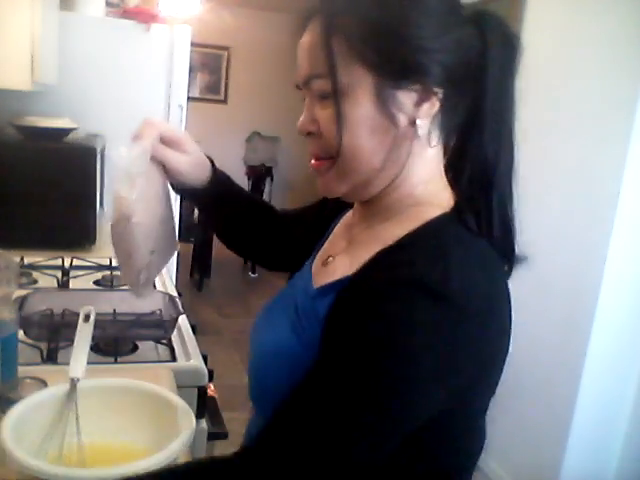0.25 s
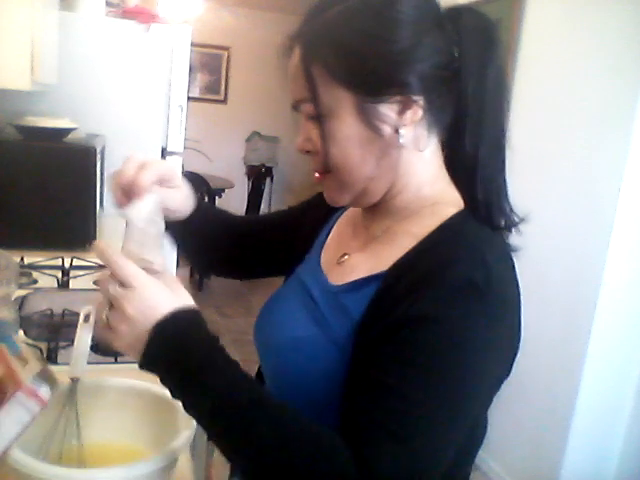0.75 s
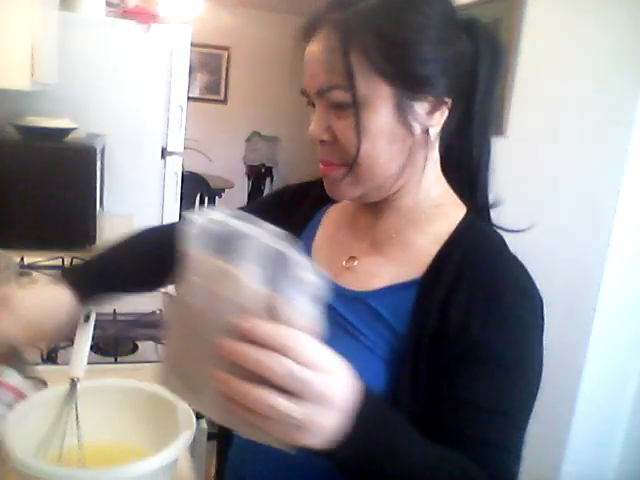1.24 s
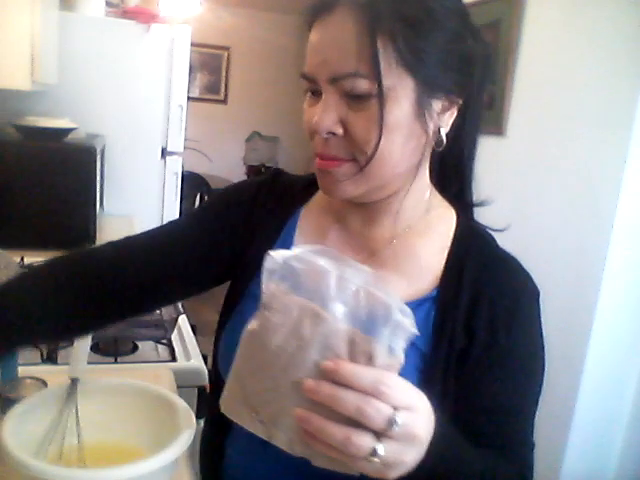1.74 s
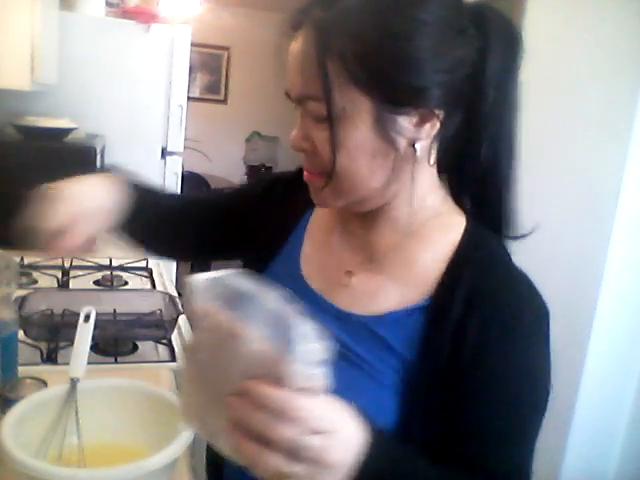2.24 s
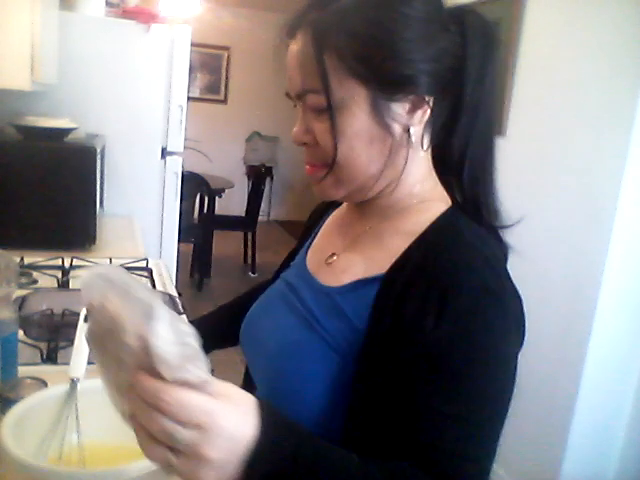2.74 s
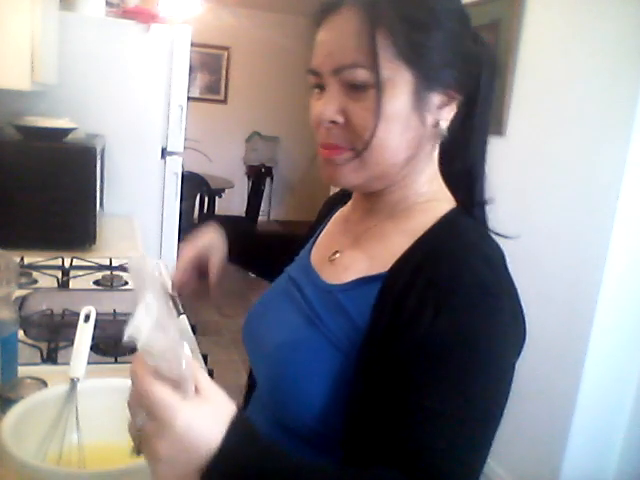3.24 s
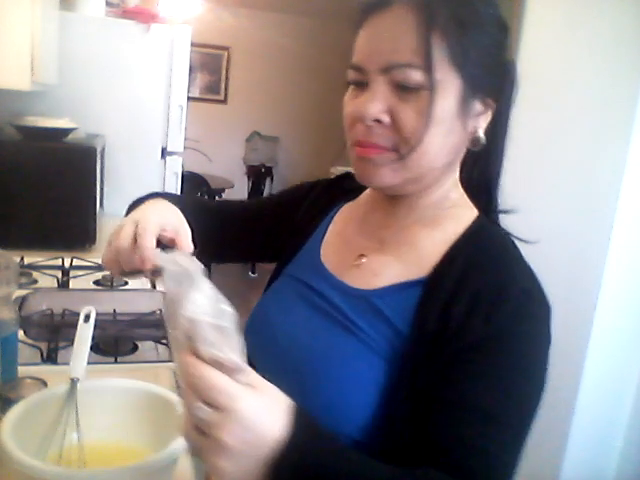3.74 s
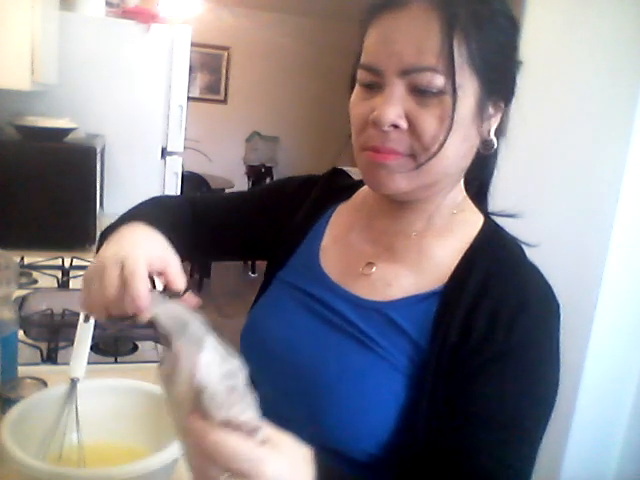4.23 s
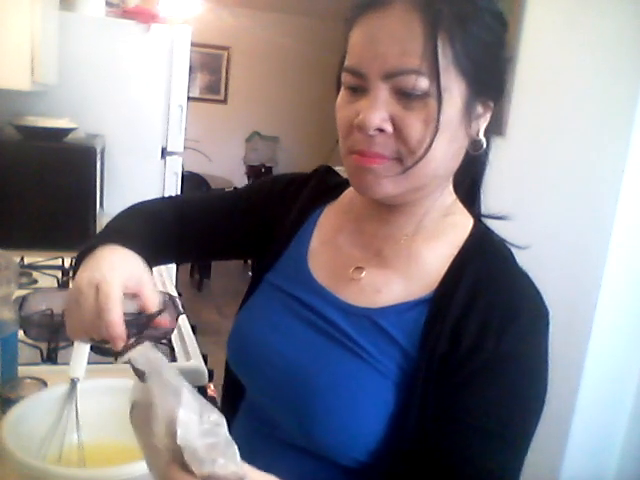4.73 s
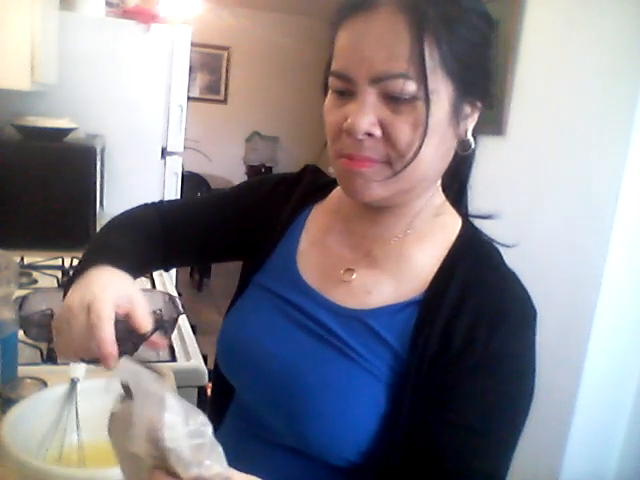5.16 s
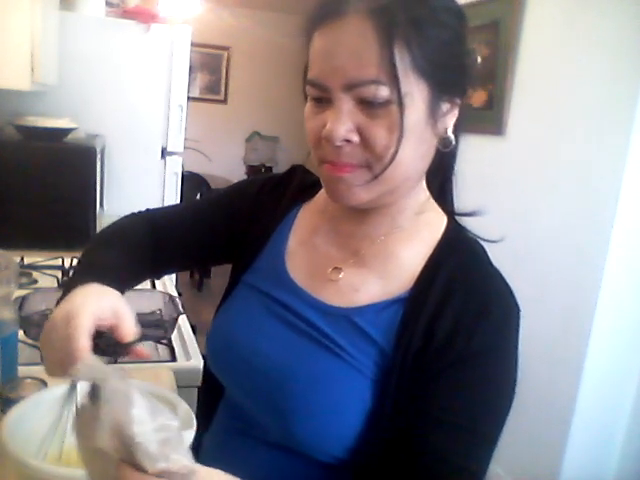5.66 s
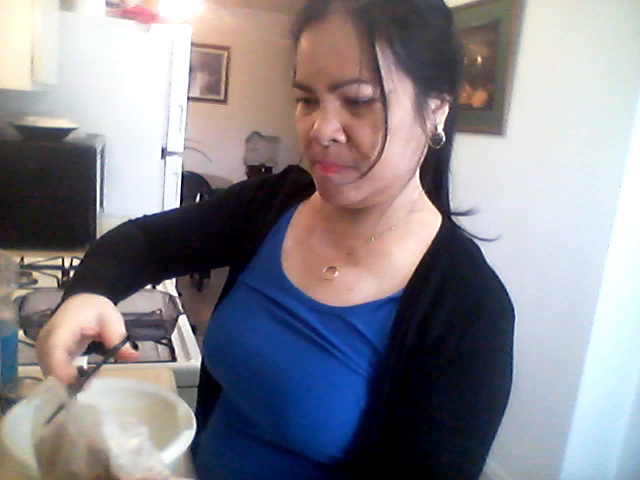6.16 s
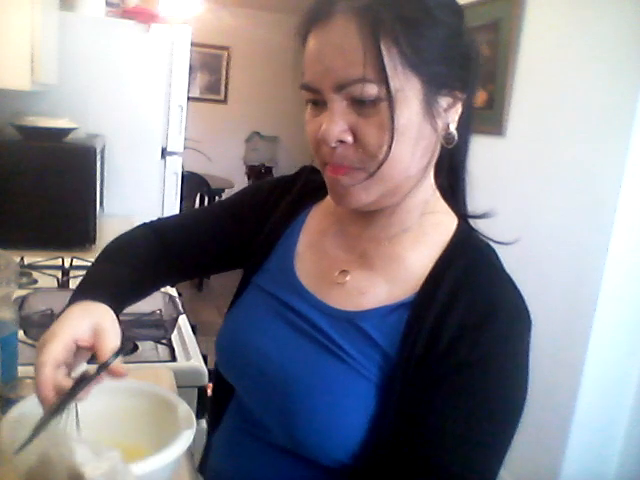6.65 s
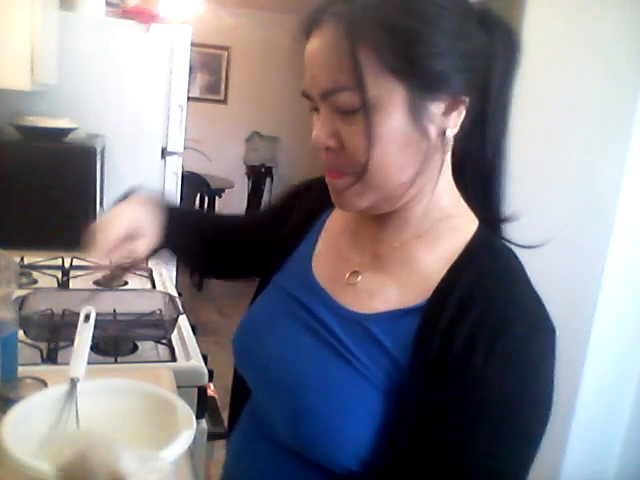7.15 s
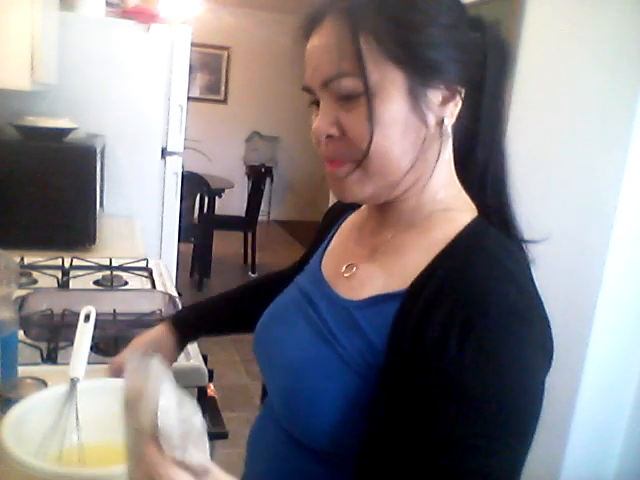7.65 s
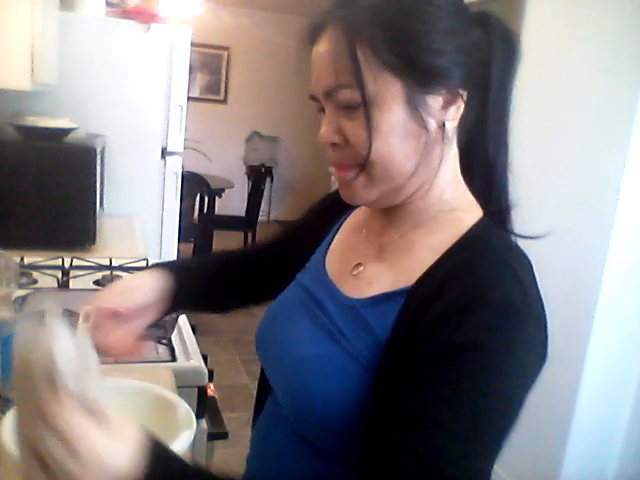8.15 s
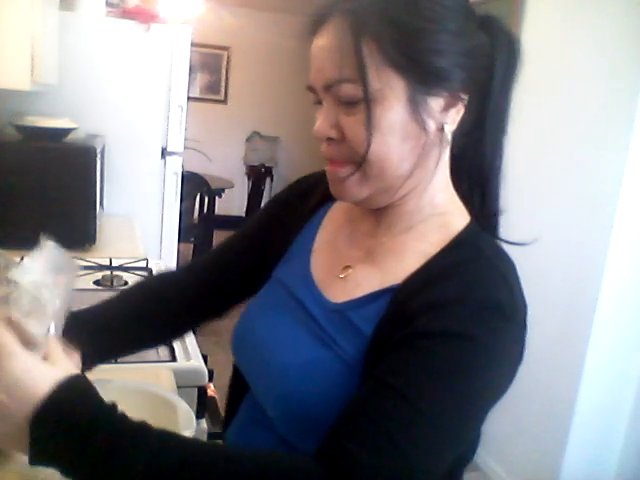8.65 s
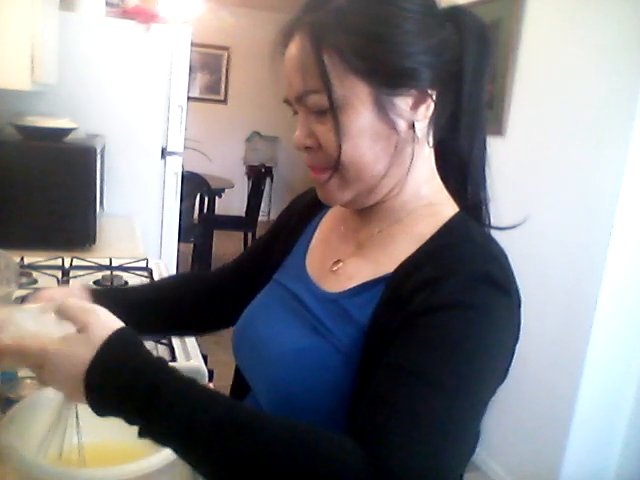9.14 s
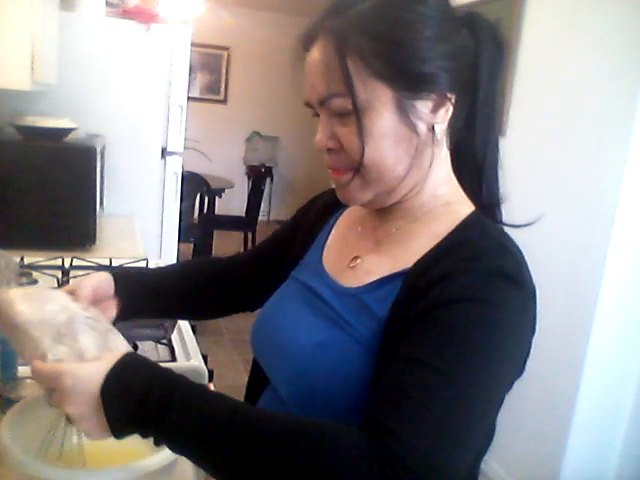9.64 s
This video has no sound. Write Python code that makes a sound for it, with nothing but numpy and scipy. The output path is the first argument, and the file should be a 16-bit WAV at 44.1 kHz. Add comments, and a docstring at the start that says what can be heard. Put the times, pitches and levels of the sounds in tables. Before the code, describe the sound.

A plastic pouch crinkles in someone's hands while a cardboard box bumps softly on a counter. Scissors are picked up with a brief metallic rattle, and the plastic crackles densely as it is cut. The scissors are then dropped with a loud clatter, and the crinkling resumes. The sounds are close, in a small kitchen with a short echo and a faint appliance hum.

```python
"""Cutting open a plastic pouch

A pouch of powder is handled and cut open in a small kitchen, over the hum of an appliance. Creases in
the film crackle and snap as brief bursts of noise. A cardboard box bumps the counter, exciting damped
resonances, and friction gives faint squeaks. Scissors are picked up and dropped: their steel blades
ring in many modes and their loose handles clatter. The walls add a short reverberation."""
import sys
import numpy as np
from scipy import signal
from scipy.fft import rfft, irfft, next_fast_len
from scipy.io import wavfile

SR = 44100
rng = np.random.default_rng(int(sys.argv[2]) if len(sys.argv) > 2 else 0)


def unload_audio(sound):
    """Save the sound as a 16-bit wav file, at the path given as the first command line argument."""
    columns = np.transpose(np.atleast_2d(sound))
    # keep every value between -1 and 1, then stretch to whole-number steps
    steps = np.round(np.clip(columns, -1, 1) * 32767)
    wavfile.write(sys.argv[1], SR, steps.astype(np.int16))


N = 437472

# creases snapping: t/s, level/dB, relative dull body/dB, relative crisp top/dB, f/Hz
SNAPS = [(0.0592, -34.5, -18, -11, 6050), (0.145, -38, -15, -22, 6190), (0.2139, -39, -18, -11, 5060),
         (0.2304, -30.5, -25, -17, 5790), (0.2816, -35, -1, -28, 5280), (0.347, -33, -28, -13, 6090),
         (0.398, -40, -17, -31, 4830), (0.451, -32, -42, -18, 5780), (0.5014, -40, -14, -28, 4210),
         (0.5668, -29.5, -30, -22.5, 3050), (0.621, -42.5, -13, -16, 5450), (0.6937, -36, 3, -43, 2510),
         (0.7746, -51, -4, -23, 3070), (0.8026, -27.5, -9, -19, 4930), (0.843, -21, -26, -28, 6030),
         (0.8845, -26, -18, -37, 6130), (0.9373, -28, -28, -18, 6350), (0.9684, -27, -31, -30, 6290),
         (1.065, -33, -12, -24, 6030), (1.1573, -35, -35, -36, 5150), (1.176, -32, -45, -19, 5820),
         (1.3993, -34.5, -18, -24, 5740), (1.5604, -54, -6, -25, 3240), (1.8117, -46.5, -14, -29, 2670),
         (1.883, -42, -36, -19, 5480), (1.944, -29.5, -16, -19, 2590), (1.9776, -25, -9, -21, 5610),
         (2.088, -32, -14, -25, 5400), (2.139, -50, -1.5, -22, 6030), (2.3285, -43.5, -13, -21, 5960),
         (2.4154, -39.5, -20, -20, 3200), (3.1213, -52, -29, -5, 6340), (3.1747, -54, -12, -12, 6100),
         (3.243, -38.5, -14, -27, 4910), (3.2914, -53, -15, -26, 3020), (3.3457, -50, -9, -9, 5570),
         (3.3738, -44.5, 0, -4.5, 3230), (3.641, -52, -18, -26, 2750), (3.8556, -37.5, -18, -19, 3010),
         (3.8916, -33.5, -20, -21, 5510), (3.9517, -42, -10, -29, 4120), (4.0013, -24.5, -36, -16, 6350),
         (4.0136, -20, -25, -25, 6350), (4.0513, -15.5, -22, -20, 2960), (4.1428, -17, -30, -17, 3660),
         (4.217, -25.5, -15.5, -32, 5830), (4.3445, -29.5, -14, -24, 4600), (4.3576, -28.5, -17, -15, 4450),
         (4.4164, -30, -32, -25, 4430), (4.4454, -31.5, -7, -17, 3500), (4.518, -23.5, -40, -11, 4460),
         (4.6044, -33, -26, -11, 4570), (4.6243, -28, -29, -24, 3850), (4.6533, -22, -34, -27, 6200),
         (4.8335, -24.5, -40, -25, 4600), (4.8948, -34.5, -9.5, -14, 6290),
         (4.938, -20.5, -17.5, -16, 5900), (5.017, -31, -15, -15, 6970), (5.0546, -33, -22, -18, 6010),
         (5.1803, -32, -16, -22, 5250), (5.2609, -47, -12, -13, 3990), (5.3416, -28.5, -31, -13, 5700),
         (5.372, -29, -14, -26, 4000), (5.4051, -16.5, -21.5, -18.5, 2510), (5.456, -25, -16.5, -21, 3960),
         (5.5404, -16.5, -35, -23, 6230), (5.6096, -27, -21, -21, 5010), (5.6407, -25, -8, -18, 6160),
         (5.7189, -36.5, -24, -36, 5830), (5.8577, -31, -15, -7, 6420), (5.998, -28, -28, -15, 6130),
         (6.0485, -29.5, -16, -13, 5600), (6.085, -26.5, -20, -17, 5650), (6.123, -36, -33, -25, 5970),
         (6.183, -25.5, -33.5, -14.5, 5970), (6.2045, -25.5, -29, -20, 6420), (6.31, -32, -28, -23, 4570),
         (6.329, -19.5, -29, -20, 6860), (6.358, -21.5, -30, -14, 5770), (6.402, -26, -24, -13, 5710),
         (6.4425, -19, -17, -25, 5830), (6.5295, -32.5, -14.5, -18, 5910), (6.5512, -27.5, -26, -17, 5840),
         (6.641, -34, -13, -18, 4450), (6.669, -34, -17, -17, 5590), (6.708, -32, -27, -17, 5730),
         (6.7675, -25, -7.5, -16, 3890), (6.8192, -28.5, -23, -6.5, 5500), (6.8733, -38, -10, -31, 3940),
         (6.987, -23.5, -19, -17.5, 6060), (8.3784, -35.5, -28, -8.5, 4490),
         (8.4598, -33.5, -35, -14, 5940), (8.4754, -28, -36, -13, 5970), (8.526, -32.5, -36, -12.5, 5620),
         (8.635, -30.5, -44, -16, 5990), (8.6687, -29.5, -39, -15, 5990), (8.688, -32, -35, -21, 6180),
         (8.739, -35, -34, -13, 6170), (8.9216, -38, -15, -21, 6500), (8.956, -37, -25, -15, 5890),
         (9.0075, -30, -9, -22, 6040), (9.0593, -54, -32, -37, 5640), (9.0895, -33, -23, -34, 5960),
         (9.1436, -31, -15, -22, 5220), (9.175, -28, -16, -17, 5030), (9.2209, -23.5, -29, -23, 6460),
         (9.239, -19.5, -26, -22, 5300), (9.2683, -29, -15, -13, 5170), (9.3258, -25, -29, -16.5, 6210),
         (9.3877, -27.5, -11.5, -22, 5700), (9.4466, -22.5, -22, -10.5, 5730), (9.495, -20, -42, -19, 5770),
         (9.5557, -36, -25, -29, 5830), (9.5984, -21.5, -20, -19, 5260), (9.6699, -38, -24, -19, 5560),
         (9.7971, -31.5, -9.5, -9, 6380), (9.848, -33, -18, -18, 6290)]
# hands squeezing, turning or cutting the pouch: t/s, swell/s, level/dB, swell/dB, relative dull body/dB
SQUEEZES = [(0, 0.0062, -40, -34, -2.5), (.1, 0.076, -52.5, 2, -14), (.21, 0.095, -43.5, 11, -0.5),
            (.33, 0.097, -53, 9, -13), (.44, 0.021, -45.5, -2, -16), (.69, 0.013, -52.5, -21, -5),
            (.76, 0.11, -33, 20.5, -7), (.87, 0.098, -34, 8.5, -6), (1.15, 0.0087, -41, -4, -27),
            (1.2, 0.19, -61.5, -5, -7), (1.395, 0.087, -57, 11, -7), (1.88, 0.07, -49, 8, 3),
            (2.08, .01, -48, 14, -5), (2.33, 0.11, -68, -2, -10), (3.11, 0.014, -57, 17, -5),
            (3.16, 0.13, -59.5, 6, -6), (3.366, 0.17, -67.5, -18, -20), (3.64, .1, -74, -11, -14),
            (3.8, .18, -53, 5.5, -12), (3.99, 0.055, -28.5, 12.5, -9), (4.135, 0.11, -35, 7, -7.5),
            (4.3, .09, -45.5, 6, -7.5), (4.4, 0.067, -30, 10.5, -10), (4.47, 0.035, -25, 9.5, -10),
            (4.6, 0.071, -31, 15, -7), (4.74, 0.1, -56.5, -4, -7), (4.83, .12, -33.5, 38, -7),
            (5, 0.073, -29.5, 37, -6.5), (5.15, 0.05, -43, 0, -10), (5.24, 0.075, -39, 1.5, -9.5),
            (5.345, 0.061, -32.5, 6, -3.5), (5.44, 0.11, -51.5, -5, -1.5), (5.525, 0.016, -32.5, -6, -6.5),
            (5.57, .17, -47.5, -10, -7.5), (5.755, 0.11, -24, 17, -7.5), (5.96, .05, -28.5, 17.5, -8.5),
            (6.04, 0.19, -44.5, -4, -8.5), (6.3, 0.12, -32, 9.5, -8), (6.52, 0.038, -39.5, 28, -8),
            (6.61, 0.098, -41, 9, -7.5), (6.73, 0.024, -43, 19, -16), (6.81, 0.026, -45, 6, -9),
            (6.975, 0.06, -51, 1, -15.5), (8.38, 0.066, -56.5, 23, -9.5), (8.56, .06, -56, 18, -23),
            (8.622, .23, -37.5, 9.5, -13.5), (8.88, .31, -41, 6, -5.5), (9.2, 0.044, -47, 9, -1),
            (9.26, 0.044, -56, 5, 0), (9.32, 0.12, -48, 4, -1.5), (9.42, 0.082, -29.5, 16, -12.5),
            (9.53, 0.16, -34.5, 14, -9), (9.76, 0.037, -37, 25, -10), (9.85, 0.056, -51.5, 2, 1.5)]
# spectrum of the crackling film: f/Hz, level/dB
FILM_SPECTRUM = [(710, -47), (1200, -16.5), (1490, -5), (1770, -11), (2040, -5.5), (2270, -11.5),
                 (2480, -5), (4450, -1), (4910, -2.5), (5780, 1.5), (7100, -4.5), (8720, -13.5),
                 (12700, -18.5), (16000, -24.5)]
# dull body spectrum of the pouch, the box and the knocks: f/Hz, level/dB
BODY_SPECTRUM = [(150, -38), (250, -79), (292, -6), (515, -0.5), (612, -3), (1050, 3), (1200, -2),
                 (2500, -0.5), (3250, -13), (5500, -120)]
# spectrum of the appliance drone: f/Hz, level/dB
DRONE_SPECTRUM = [(25, -49.5), (33, -43), (55, -12.5), (104, -8), (200, -10), (225, -22), (285, -14.5),
                  (450, -15), (630, -14.5), (820, -17.5), (1120, -23.5), (1350, -28.5), (1700, -31),
                  (4000, -38), (9000, -42), (16000, -39.5)]
# motor housing resonances: f/Hz, bandwidth/Hz, level against the drone/dB
HOUSING_MODES = [(105, 8.5, -5.5), (310, 33, -9.5), (378, 15, -7), (534.4, 5.8, -6), (661, 20, -12.5)]
# box and hands bumping the counter: t/s, thud level/dB, thud f/Hz, knock level/dB, knock f/Hz
BUMPS = [(0.2, -38, 88, -37, 880), (0.231, -23.5, 176, -31.5, 437), (0.282, -36, 103, -35, 418),
         (0.691, -65, 387, -29, 517), (0.709, -36, 121, -37.5, 547), (0.74, -54, 357, -38, 1310),
         (0.759, -33, 377, -29.5, 860), (0.818, -52, 293, -35.5, 1310), (0.92, -55, 278, -35.5, 465),
         (1.279, -58, 155, -40.5, 775), (1.884, -36, 184, -34.5, 1000), (1.939, -34, 346, -36.5, 447),
         (1.979, -42, 338, -30.5, 516), (2.02, -57, 99.6, -58, 550), (2.678, -47, 302, -47, 600),
         (2.929, -52, 308, -61, 600), (4.761, -47, 105, -52, 596), (7.592, -34.5, 353, -31, 406),
         (7.906, -33, 356, -19, 754), (7.942, -32.5, 103, -14.5, 1510), (9.16, -42, 338, -53, 500),
         (9.755, -42.5, 105, -68, 503)]
# spectrum of the rumbling counter: f/Hz, level/dB
RUMBLE_SPECTRUM = [(60, -43.5), (100, 14.5), (160, 2.5), (250, -6.5), (340, -2), (500, -47)]
# short friction chirps: t/s, level/dB, f/Hz
CHIRPS = [(2.225, -63, 2160), (2.99, -42, 880), (3.21, -63, 3030), (3.23, -57, 2350), (7.763, -32, 1043),
          (8.14, -45, 2705)]
# friction squeaks: t/s, swell/s, lower band level/dB, swell/dB, relative upper band/dB
SQUEAKS = [(2.34, .1, -62, 14, 5.5), (3.38, 0.15, -69.5, -11, 3.5), (3.64, 0.017, -71.5, 0, -2),
           (7.1, 0.052, -64.5, 11, -12)]
# lower and upper squeak resonances: f/Hz, bandwidth/Hz
SQUEAK_BANDS = [(2560, 210), (3250, 95)]
# scissors striking the counter:
# t/s, level/dB, clank f/Hz, knock level/dB, knock f/Hz, relative blade ring/dB, relative tick/dB
CLANKS = [(2.6589, -38.5, 1950, -32.5, 1150, -22.5, -20), (2.6816, -23.5, 2740, -30, 1230, -45.5, -24),
          (2.7563, -39, 3630, -38, 1020, -32, -17), (2.8135, -32, 4000, -49, 1090, -45, -22),
          (2.872, -35, 5700, -41, 930, -33, -33), (2.9058, -22, 5960, -32.5, 980, -50, -54),
          (2.957, -34.5, 2350, -60, 950, -32, -36), (3.0005, -33.5, 5400, -85, 850, -18, -34),
          (7.595, -18.5, 1970, -37, 1720, -29.5, -25), (7.6144, -26.5, 3950, -36.5, 780, -36, -15),
          (7.6606, -29, 2150, -56, 926, -35, -29), (7.705, -32, 1970, -52, 1520, -32, -29),
          (7.7624, -29, 6650, -36.5, 1060, -13.5, -26.5), (7.8154, -29, 2080, -41, 930, -31, -22),
          (7.9041, -14.5, 6270, -21, 1174, -34, -20), (7.9195, -22, 6800, -25.5, 705, -27.5, -16),
          (7.942, -6, 2870, -26, 1610, -35, -33), (7.9509, -15, 3150, -25, 742, -44, -14),
          (7.988, -31, 5700, -39, 1570, -37, -26), (8.0543, -26.5, 2650, -34.5, 1180, -33, -21),
          (8.107, -33.5, 6100, -40, 920, -36, -21), (8.136, -47, 2800, -40, 1480, -39, -23),
          (8.1726, -39.5, 3420, -44, 1580, -24, -27), (8.2136, -37.5, 2750, -45.5, 686, -37, -25),
          (8.259, -51, 2560, -50, 721, -24, -24)]
# scissors dragging on the counter: t/s, swell/s, scrape level/dB, swell/dB, relative hollow handle/dB
DRAGS = [(2.66, 0.27, -52.5, 2.5, -1), (7.66, 0.47, -54.5, 5.5, 1)]
# modes of the steel blades: f/Hz
BLADE_HZ = [2110, 2400, 2700, 2950, 3270, 3860, 4050, 4600, 5150, 5870, 6050, 6550, 6830, 7200, 8240, 8990,
            9560, 10250, 11250, 12480, 14170]
# ring of each blade mode: level/dB, T60 before scaling/s
BLADE_RING = [(-2, 0.032), (-7.5, .05), (-5, 0.026), (-24, 0.056), (-13.5, 0.088), (-13, 0.036),
              (-21, 0.026), (-7.5, 0.079), (-4, 0.085), (6, 0.024), (-20, 0.042), (-33, 0.038),
              (5.5, 0.056), (-6.5, 0.066), (-8, 0.17), (-25.5, .06), (-5, 0.072), (-16.5, .07),
              (-11, 0.032), (-10, 0.15), (-15.5, .06)]
# spectrum of the clattering handles: f/Hz, level/dB
CLATTER_SPECTRUM = [(700, -25), (1300, -14.5), (2500, -4.5), (3200, -2.5), (5000, -3.5), (6800, -6),
                    (7600, -28), (16000, -64)]
# spectrum of the bright contact tick: f/Hz, level/dB
TICK_SPECTRUM = [(6500, -35), (7500, 10), (11000, 3), (16000, -1)]
# reverberation time of the kitchen: f/Hz, T60/s
KITCHEN_T60 = [(100, 0.23), (300, 0.68), (1000, 0.35), (5000, 0.31), (14000, 0.31)]


def amp(db):
    """Amplitude ratio of a level in decibels."""
    return 10 ** (np.asarray(db) / 20)


def rms_one(x):
    """Normalisation to unit rms."""
    return x / np.sqrt(np.mean(x ** 2) + 1e-20)


def at_hz(points, hz):
    """Interpolation of an (f/Hz, value) table on a logarithmic frequency axis."""
    frequencies, values = np.transpose(points)
    return np.interp(np.log(hz + 1), np.log(frequencies), values)


def coloured(spectrum):
    """Spectral shaping of white noise, at unit rms."""
    size = next_fast_len(N)
    gain = amp(at_hz(spectrum, np.fft.rfftfreq(size, 1 / SR)))
    return rms_one(irfft(rfft(rng.standard_normal(size)) * gain, size)[:N])


def impulses(times, db):
    """An impulse train, one impulse per event."""
    out = np.full(N, 1e-18)
    np.add.at(out, (np.asarray(times) * SR).astype(int), amp(db))
    return out


def decays(times, db, t60, rise_s=0.00028):
    """Superposed envelopes: a quick rise at each event, then exponential decay."""
    rise, fall = np.exp(-1 / (rise_s * SR)), amp(-60 / (t60 * SR))
    return signal.lfilter([1 - rise], np.convolve([1, -rise], [1, -fall]), impulses(times, db))


def swells(rows, fade_db_per_s):
    """Exponential swell (a fall if negative) to each level, then a fade: main and companion gains."""
    main, companion = np.zeros(N), np.zeros(N)
    now = np.arange(SR) / SR
    onset = np.minimum(now / 0.0092, 1)
    for start, swell_s, level_db, swell_db, relative_db in rows:
        db = np.where(now < swell_s, swell_db * (now / swell_s - 1), fade_db_per_s * (swell_s - now))
        first = int(start * SR)
        gain = (amp(level_db + db) * onset)[:N - first]
        main[first:first + SR] += gain
        companion[first:first + SR] += amp(relative_db) * gain
    return main, companion


def resonate(x, hz, t60):
    """A damped harmonic oscillator: its impulse response is a decaying sine."""
    r, w = amp(-60 / (t60 * SR)), 2 * np.pi * hz / SR
    return signal.lfilter([0, np.sin(w)], [1, -2 * r * np.cos(w), r * r], x)


def narrow_noise(hz, width_hz):
    """A noise-driven resonance at unit rms; decay time is inversely proportional to bandwidth."""
    return rms_one(resonate(rng.standard_normal(N), hz, np.log(1000) / (np.pi * width_hz)))


def struck_notes(times, db, hz, ring_s, rattle_s):
    """Transient excitation: an impulse and a dying rattle drive one resonance per event."""
    out, now = np.zeros(N + SR), np.arange(SR // 3) / SR
    for s, level_db, pitch_hz in zip(times, db, hz):
        force = (now == 0) + 0.12 * rng.standard_normal(len(now)) * amp(-60 * now / rattle_s)
        note, start = resonate(force, pitch_hz, ring_s), int(s * SR)
        out[start:start + len(now)] += amp(level_db) * note / np.abs(note).max()
    return out[:N]


def pouch(creases_per_s=800):
    """Buckling of film: a Poisson stream of small creases follows the hands, among larger snaps."""
    motion, dull_motion = swells(SQUEEZES, fade_db_per_s=342.5)
    crease_at = np.flatnonzero(rng.random(N) < creases_per_s / SR) / SR
    size_db = 0.85 * np.minimum(rng.exponential(1, len(crease_at)), 3.5)
    snap_at, snap_db, body_db, top_db, pitch_hz = np.transpose(SNAPS)
    film = rfft(coloured(FILM_SPECTRUM))
    edges_hz = [1, 2200, 2900, 3700, 4700, 5900, 7400, SR]
    hz, out = np.fft.rfftfreq(N, 1 / SR), 0
    for low, high in zip(edges_hz, edges_hz[1:]):
        band = irfft(film * (hz >= low) * (hz < high), N)
        crease_db = size_db + 4.3 * rng.standard_normal(len(crease_at))   # each has its own colour
        if high < SR:   # a snap is strongest near its own pitch
            octaves_off = np.abs(np.log2(np.sqrt(max(low, 1600) * high) / pitch_hz))
            crackle = amp(-4) * motion * rms_one(decays(crease_at, crease_db, t60=0.041))
            snaps = decays(snap_at, snap_db - 5 - 12.1 * octaves_off, t60=0.045, rise_s=0.0015)
        else:   # the crisp top is shorter and has its own strength
            band = rms_one(band)
            crackle = amp(-16) * motion * rms_one(decays(crease_at, crease_db, t60=0.026, rise_s=0.0002))
            snaps = decays(snap_at, snap_db + top_db - 1, t60=0.033)
        out = out + band * (crackle + snaps)
    dull_crackle = amp(-7) * dull_motion * rms_one(decays(crease_at, size_db, t60=0.087))
    dull_snaps = decays(snap_at, snap_db + body_db - 2, t60=0.027)
    return out + coloured(BODY_SPECTRUM) * (dull_crackle + dull_snaps)


def appliance_hum(waver_hz=4.9, waver_db=1.9):
    """Forced vibration: housing resonances stand out of a motor's drone, whose bass wavers in level."""
    pole = np.exp(-2 * np.pi * waver_hz / SR)
    slow_noise = signal.lfilter([1], [1, -2 * pole, pole * pole], rng.standard_normal(N + SR))
    bass_gain = amp(waver_db * rms_one(slow_noise[SR:]))
    drone = coloured(DRONE_SPECTRUM)
    bass = signal.sosfilt(signal.butter(2, 300, fs=SR, output="sos"), drone)
    housing = sum(amp(db) * narrow_noise(hz, width_hz) for hz, width_hz, db in HOUSING_MODES)
    return amp(-63.5) * (drone + bass * (bass_gain - 1) + housing)


def box_bumps():
    """Impact excites both bodies: the counter thuds and rumbles, the hollow box knocks and rustles."""
    at, thud_db, thud_hz, knock_db, knock_hz = np.transpose(BUMPS)
    thud = struck_notes(at, thud_db - 4.5, thud_hz, ring_s=0.11, rattle_s=0.047)
    rumble = decays(at, thud_db - 12.5, t60=0.39, rise_s=0.0062) * coloured(RUMBLE_SPECTRUM)
    rustle = decays(at, knock_db - 9.5, t60=0.064, rise_s=0.0024) * coloured(BODY_SPECTRUM)
    knock = struck_notes(at, knock_db - 2.5, knock_hz, ring_s=0.019, rattle_s=0.17)
    return thud + rumble + rustle + knock


def squeaks():
    """Friction drives two narrow resonances and sets off a few short chirps."""
    lower, upper = [narrow_noise(hz, width_hz) for hz, width_hz in SQUEAK_BANDS]
    lower_gain, upper_gain = swells(SQUEAKS, fade_db_per_s=127)
    chirps = struck_notes(*np.transpose(CHIRPS), ring_s=0.05, rattle_s=0.22)
    return lower * lower_gain + upper * upper_gain + chirps


def blades(at, blow_db, tick_db, scrape, rattles_per_s=1600):
    """Modal vibration: steel blades ring briefly under rattling blows."""
    ring, t60_scale = 0, 0.6   # scale on the blade modes' ring times
    scatter_db = 4.5 * rng.standard_normal((len(at), len(BLADE_HZ)))
    for k, (hz, (level_db, t60)) in enumerate(zip(BLADE_HZ, BLADE_RING)):
        is_low = hz < 8000   # scraping drives the lower modes; the highest follow the tick
        contact_db = blow_db + scatter_db[:, k] + (0 if is_low else tick_db + 21.5)
        flurry = rng.standard_normal(N) * (rng.random(N) < rattles_per_s / SR)
        blows = impulses(at, contact_db) + decays(at, contact_db, t60=0.13) * flurry
        friction = is_low * amp(-54) * scrape * rng.standard_normal(N)
        ring = ring + amp(level_db) * resonate(blows + friction, hz, t60_scale * t60)
    return ring


def scissors():
    """Impact and sliding friction: blades ring, loose handles clatter, knock hollowly and scrape."""
    at, level_db, clank_hz, knock_db, knock_hz, ring_db, tick_db = np.transpose(CLANKS)
    scrape, handle_gain = swells(DRAGS, fade_db_per_s=126)
    ring = blades(at, level_db + ring_db, tick_db, scrape)
    contacts = decays(at, level_db - 25.5, t60=0.013) + decays(at, level_db - 14, t60=0.09)
    clatter = (contacts + amp(-2) * scrape) * coloured(CLATTER_SPECTRUM)
    tick = (decays(at, level_db + tick_db, t60=0.057) + amp(-16) * scrape) * coloured(TICK_SPECTRUM)
    clank = struck_notes(at, level_db - 10, clank_hz, ring_s=0.02, rattle_s=0.09)
    handles = handle_gain * rms_one(resonate(rng.standard_normal(N), hz=820, t60=0.006))
    knock_noise = decays(at, knock_db - 6, t60=0.091, rise_s=0.0054) * coloured(BODY_SPECTRUM)
    knock_note = struck_notes(at, knock_db - 0.5, knock_hz, ring_s=0.023, rattle_s=0.11)
    return ring + clatter + tick + clank + handles + knock_noise + knock_note


def kitchen(x):
    """Diffuse reverberation: convolution with octave bands of noise, each decaying at its own rate."""
    now, echoes = np.arange(SR // 2) / SR, 0
    for low in 60 * 2. ** np.arange(8):
        octave = signal.butter(2, [low, 2 * low], "band", fs=SR, output="sos")
        band = signal.sosfilt(octave, rng.standard_normal(len(now)))
        echoes = echoes + band * amp(-60 * now / at_hz(KITCHEN_T60, low * np.sqrt(2)))
    echoes = echoes * np.minimum(now / 0.0031, 1)   # near walls: the echoes build up quickly
    return signal.fftconvolve(x, echoes / np.linalg.norm(echoes))[:N]


def scene():
    """Superposition of the direct sound from the counter, its reverberation and the hum."""
    direct = pouch() + box_bumps() + scissors() + squeaks()
    low_cut = signal.butter(3, 85, "high", fs=SR, output="sos")
    direct = signal.sosfilt(low_cut, direct)   # microphone low cut: removes the deep bass
    return (direct + amp(-10.5) * kitchen(direct) + appliance_hum())[None]


def record(dry):
    """Band limiting: a steep low-pass filter removes the highest treble."""
    return signal.sosfilt(signal.cheby2(20, 60, 16250, fs=SR, output="sos"), dry)


dry = scene()
out = record(dry)
unload_audio(out)
```